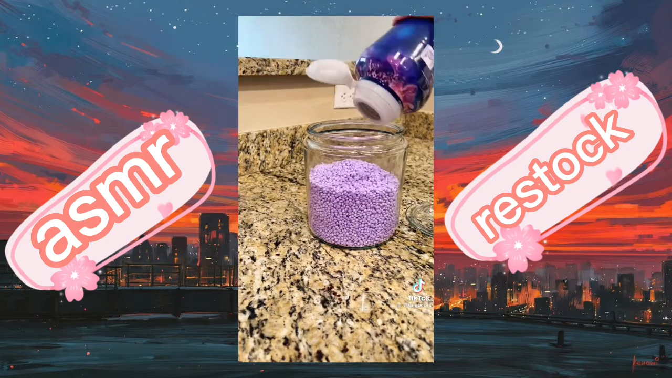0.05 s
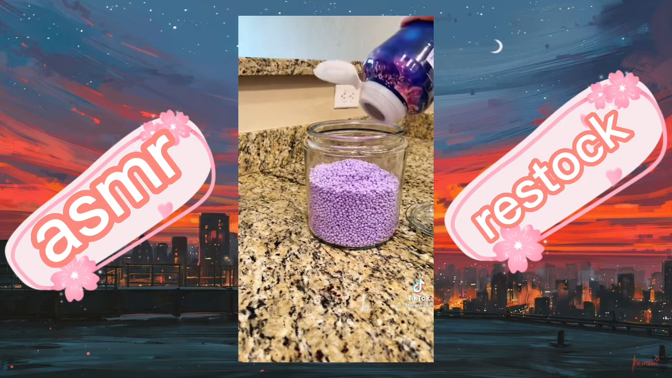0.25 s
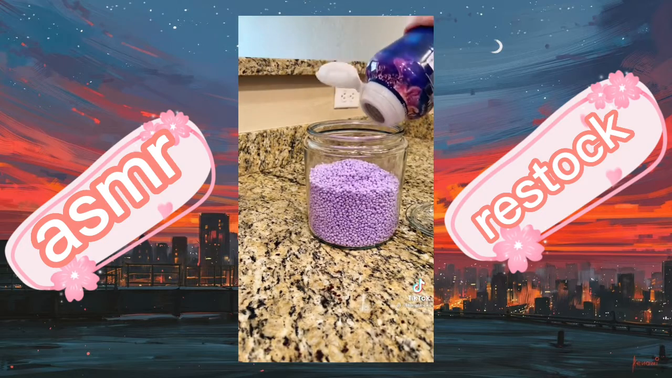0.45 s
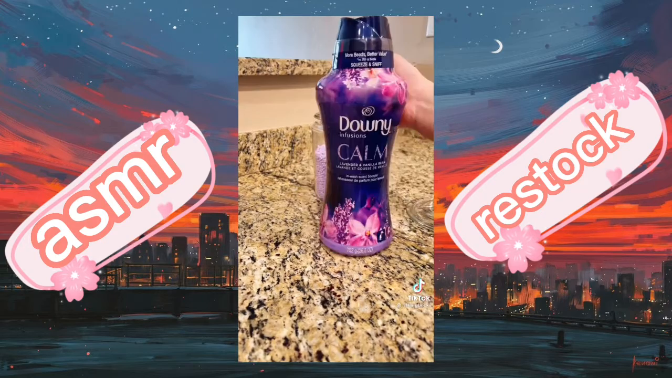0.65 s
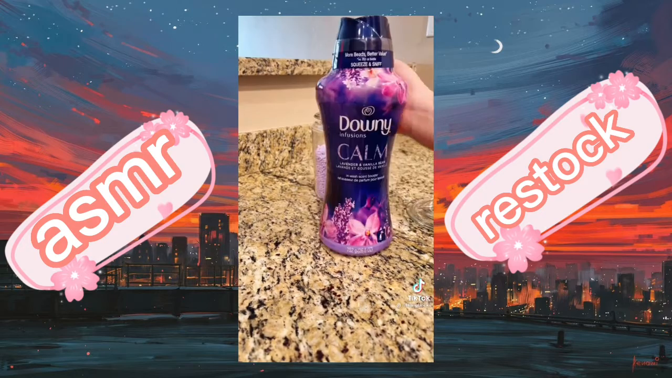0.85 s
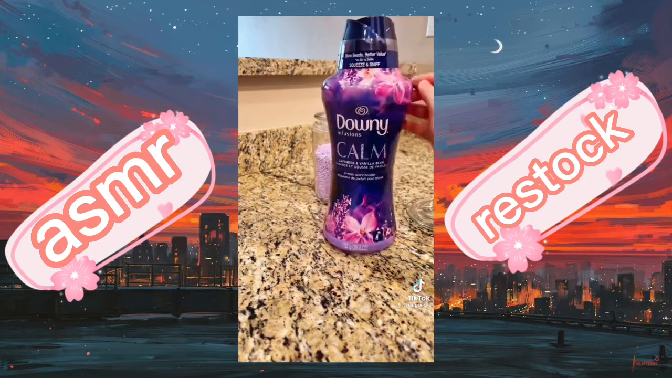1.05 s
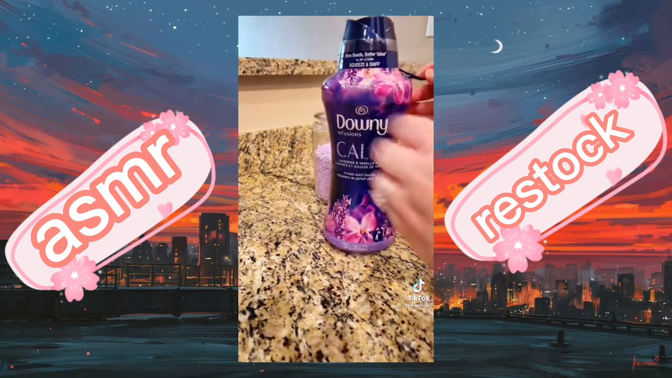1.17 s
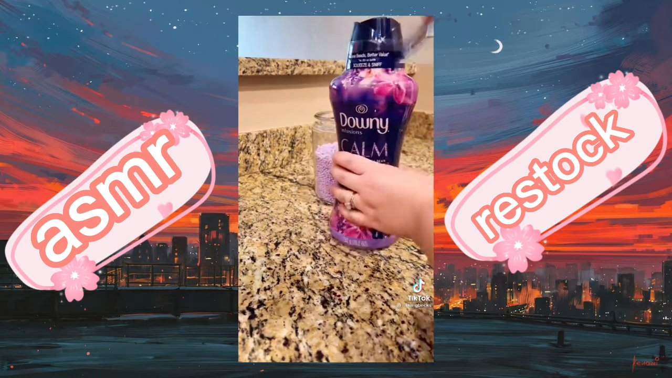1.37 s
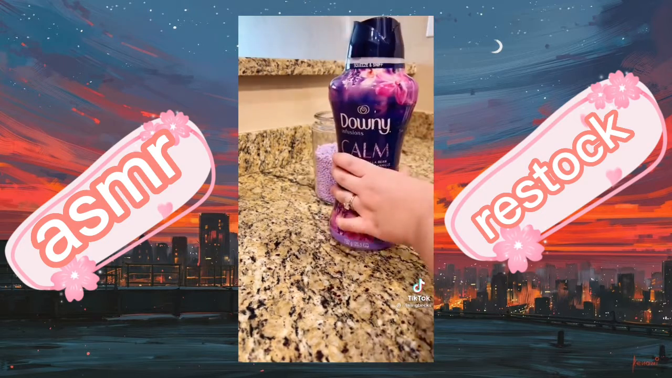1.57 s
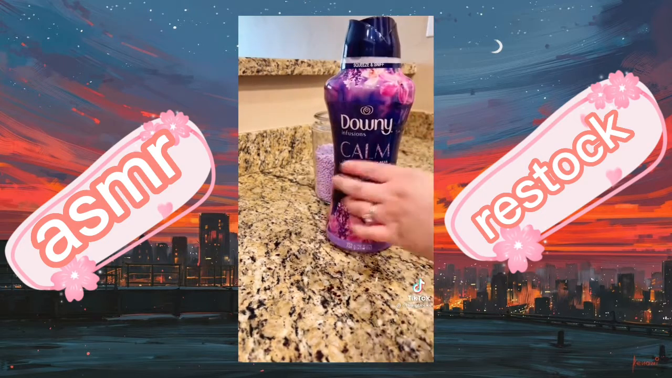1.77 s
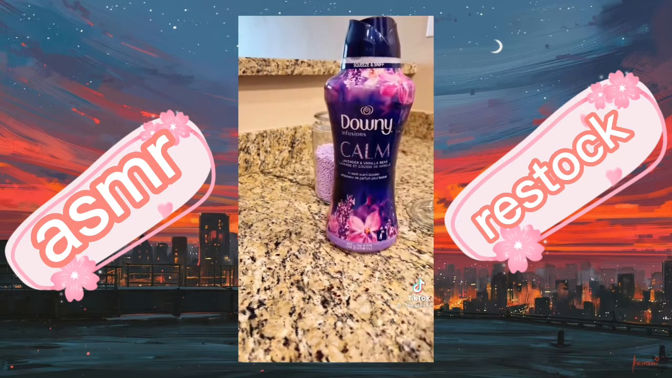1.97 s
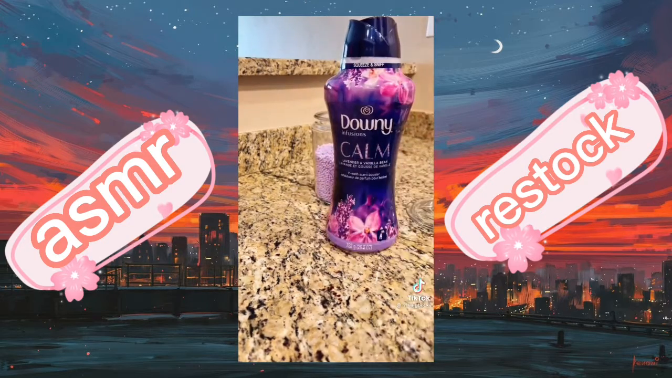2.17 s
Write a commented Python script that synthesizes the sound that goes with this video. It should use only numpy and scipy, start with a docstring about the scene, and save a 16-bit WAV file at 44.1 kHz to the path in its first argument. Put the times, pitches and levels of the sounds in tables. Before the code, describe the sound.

Scent beads rattle from a plastic bottle into a jar with hollow knocks, then cap clicks

```python
"""Scent beads trickle from a plastic bottle into a glass jar: noise-like trains of tiny impacts, with a few ticks.
A quick run of jolts cracks the bottle and makes it boom hollowly, built from decaying tones and noise.
After a short near-silence a hand rubs over a bottle on the counter (soft coloured noise), and its plastic
cap scrapes (swelling trains of slips), squeaks and clicks (short bursts with a ring).
Close, mono, in a small kitchen with a short echo tail and a low rumble."""
import sys
import numpy as np
from scipy import signal
from scipy.io import wavfile
from scipy.ndimage import uniform_filter1d

SR = 44100
rng = np.random.default_rng(int(sys.argv[2]) if len(sys.argv) > 2 else 0)


def inscribe(sig):
    """Save sig as 16-bit PCM at rate SR to the path in sys.argv[1].

    A 1-D sig is mono; a 2-D sig holds one channel per row.
    Samples are clipped to [-1, 1] before scaling.
    """
    pcm = np.round(np.clip(np.atleast_2d(sig).T, -1, 1) * 32767)
    wavfile.write(sys.argv[1], SR, pcm.astype(np.int16))


N = 97020
T = np.arange(N) / SR  # time of every sample, in seconds

# All tone tables give a spectrum shape; only the differences between their levels matter.
# Strength of the bead stream over time: time_s, level_db
BEAD_FLOW = [(0, -45), (.02, -29), (.042, -33.5), (.055, -26), (.13, -31), (.172, -25.5), (.2, -35),
             (.212, -21.5), (.245, -26), (.28, -25), (.32, -38.5), (.335, -26), (.4, -29), (.425, -19),
             (.446, -29), (.47, -20), (.5, -30.5), (.535, -34), (.58, -49), (.615, -31.5), (.655, -63)]
# Tone of the bead stream: pitch_hz, level_db
BEAD_TONE = [(180, -46.5), (300, -6.5), (600, -14.5), (1330, -12), (1670, -12), (2210, -5), (3400, 1.5),
             (5850, -9.5), (10100, -9), (12500, -20.5), (15500, -13)]
# Single beads hitting the glass, plus a bright tick on the first two cracks (0.2507, 0.3416): start_s, level_db
TICKS = [(0.0561, -24), (0.0647, -17.5), (0.1197, -18), (0.2105, -22), (0.232, -24.5),
         (0.2507, -11.5), (0.3416, -12), (0.3763, -11.5), (0.4077, -10.5), (0.4618, -8)]
# Tone of those ticks: pitch_hz, level_db
TICK_TONE = [(500, -8), (2000, -15.5), (3600, -2), (5500, -8.5), (8000, -8), (10000, -6.5), (12500, -16),
             (15000, -10.5)]
# Jolts of the bottle: start_s, crack_db, crack_rise_s, wall_db, wall_pitch_ratio, boom_db,
# flex_db (before the blow), rebound_db (relative to the boom)
JOLTS = [(0.2509, -0.5, 0.0017, -6.5, 0.99, -5.5, -22, -9),
         (0.3398, -5, 0.0013, -12, 0.97, -10, -12.5, -12), (0.4213, -8.5, 0.0031, -25.5, 1.11, -2, -11, -4),
         (.5132, -2.5, 0.0018, -8, .99, -7, -16, -22), (0.6034, -9, 0.0022, -13, 0.97, -17.5, -11, -22.5)]
# Tone of the crack: pitch_hz, level_db
CRACK_TONE = [(300, -8.5), (700, -2.5), (1200, 2.5), (2000, -5), (3500, 3), (5500, -6), (8000, -9.5),
              (10000, -5), (12500, -18), (15000, -15.5)]
# Resonance of the air in the bottle: pitch_hz, blow_db, ring_db, t60_s (time to fade by 60 dB)
HOLLOW_MODE = (176.5, -2, -10.5, 0.44)
# Resonances of the bottle wall: pitch_hz, blow_db, ring_db, t60_s
WALL_MODES = [(235.4, -5.5, -20.5, 0.24), (390.4, -7, -9.5, 0.12), (435.2, -1, -8.5, 0.16),
              (720, -14, -19, 0.15), (848, -17, -24.5, 0.09), (1157, -10, -17.5, 0.076),
              (1498, -15.5, -24.5, 0.077), (1945, -13, -24.5, 0.08), (2260, -20.5, -19.5, 0.07)]
# Tone of a soft thud: pitch_hz, level_db
THUD_TONE = [(50, -15), (100, -0.5), (150, 3.5), (290, -13), (420, -9.5), (600, -9), (1200, -18),
             (2500, -27), (8000, -50)]
# Tone of beads tumbling against the wall: pitch_hz, level_db
TUMBLE_TONE = [(200, -10), (370, 1), (440, 0.5), (550, -13), (720, -6.5), (850, -16.5), (4000, -36.5)]
# Plastic scraping on plastic: peak_s, rise_s, fall_s, hiss_db, grit_db, body_db
SCRAPE_STROKES = [(1.371, .015, 0.016, -17, -31, -19.5), (1.421, 0.027, 0.02, -48, -35, -26),
                  (1.545, 0.0084, 0.017, -28.5, -40, -34.5), (1.585, 0.0088, 0.016, -34, -23, -31),
                  (1.64, 0.0071, 0.0087, -24.5, -28, -31)]
# Tone of the hiss: pitch_hz, level_db
HISS_TONE = [(1000, -28), (3400, 5), (4500, -5.5), (6500, 3.5), (8500, -6), (10200, 6), (12200, -13),
             (14500, 2.5), (16000, -5)]
# Tone of the grit: pitch_hz, level_db
GRIT_TONE = [(850, -13), (1100, 2.5), (1500, -12), (3200, 4), (4200, -1.5), (15000, -28)]
# Tone of the bottle's body under a scrape: pitch_hz, level_db
BODY_TONE = [(60, -13), (130, 2.5), (300, -7.5), (600, -3), (850, 0.5), (1400, -6), (2300, -6.5),
             (3500, -8.5), (7000, -18), (15000, -38)]
# Clicks of the cap: start_s, level_db, fall_s, top_db (extra level of the top octave)
CAP_CLICKS = [(1.2236, -27.5, 0.0053, 18), (1.359, -18, .002, 3), (1.373, -17.5, 0.0012, 6),
              (1.426, -15, 0.0028, -12), (1.4273, -14.5, 0.0013, -9), (1.546, -5, 0.0015, 0),
              (1.585, -16, 0.0021, 5), (1.598, -24, 0.001, -4), (1.64, -11, 0.0016, -4),
              (1.6425, -19, 0.0022, 1), (1.762, -37, 0.005, 10)]
# Tone of the clicks: pitch_hz, level_db
CAP_TONE = [(300, -14), (900, -9.5), (2200, -4), (3400, 4), (4500, 1), (5500, 2), (6500, 0), (8000, 1.5),
            (9800, 1), (12300, -8.5), (14500, -4.5)]
# Ringing tones of the cap: pitch_hz, level_db, t60_s
CAP_MODES = [(3446, -14.5, 0.027), (4100, -26, .025), (5420, -14.5, 0.028), (7730, -13.5, 0.026),
             (9660, -21, 0.025)]
# Hand sliding over the bottle: time_s, level_db
HAND_RUB = [(.78, -71.5), (.876, -63.5), (.915, -46.5), (.965, -53.5), (1.005, -63), (1.025, -50.5),
            (1.1, -55), (1.122, -41.5), (1.22, -44.5), (1.29, -47.5), (1.325, -47), (1.5, -45.5),
            (1.79, -49), (1.87, -42), (1.98, -39.5), (2.06, -51), (2.2, -49.5)]
# Tone of the rubbing: pitch_hz, level_db
RUB_TONE = [(150, -27), (250, -3), (750, -10), (1100, -5.5), (1400, -10), (2440, -6.5), (8620, -16),
            (12600, -22), (15500, -15.5)]
# Beads shifting inside the bottle: start_s, level_db, fall_s
BEAD_SHIFTS = [(1.64, -16.5, 0.024), (2.13, -38.5, 0.021)]
# Tone of the shifting beads: pitch_hz, level_db
SHIFT_TONE = [(1500, -20), (2400, -3), (4400, -.5), (4780, 7), (5200, -1), (8000, -6), (10500, -11.5),
              (15000, -26)]
# Soft bumps of the hand on the bottle: start_s, level_db
HAND_BUMPS = [(1.21, -43.5), (1.31, -36.5), (1.337, -41.5), (1.585, -36), (1.759, -42), (1.984, -41.5),
              (2.124, -42)]
# Tone of the room rumble: pitch_hz, level_db
RUMBLE_TONE = [(25, -14.5), (70, -9.5), (135, 0), (260, -12.5), (500, -18), (1000, -23.5), (3000, -34.5),
               (15000, -54)]
# Level of the room rumble over time: time_s, level_db
RUMBLE_LEVEL = [(.05, 5.5), (.15, 3.5), (.78, -7.5), (1.25, -5), (1.55, 1.5), (1.82, -1), (2.2, 0)]

BEADS_PER_S, BEAD_SPREAD_DB = 5500, 2
CLUMP_S, CLUMP_DB = 0.0082, 1.5  # the beads leave the bottle in small clumps
TICK_FALL_S = CRACK_FALL_S = 0.0028
SWELL_CYCLES, SWELL_S, SWELL_SHARPNESS = 1.35, 0.003, 3.4  # how a bottle resonance builds up
DROOP, DROOP_S = 0.05, 0.0067  # the wall starts sharp by this share and relaxes
FLEX_LEAD_S, FLEX_WIDTH_S = 0.0018, 0.0054
REBOUND_S, REBOUND_FALL_S = 0.0241, 0.032  # the boom returns once more a moment later, fading faster
CHOKE_S = 0.0067  # a new jolt stops the ring of the one before
THUD_DB, THUD_RISE_S = -16.5, 0.0093
TUMBLE_DB, TUMBLE_FALL_S = -18, 0.036
SLIPS_PER_S, SLIP_SPREAD_DB = 9000, 1.5
STROKE_ROUNDNESS, BODY_LAG_S = 1.24, 0.0086
CATCH_S, CATCH_DB = 0.0011, 2  # the plastic catches and lets go
SQUEAK_S, SQUEAK_DB = (1.528, 1.546), -25.5  # the cap drags just before it snaps
TOP_HZ = 11000  # where the top octave of a click begins
BUMP_RISE_S = 0.012
ROOM_DB, ROOM_T60_S = -14, 0.26
RUMBLE_DB = -46
SILENCE_S, SILENCE_DB = (0.656, 0.781), -36  # span and gain of the near-silence
EDGE_HZ = 15650  # upper edge of the sound's band


def beads():
    """The stream patters on the heap as many tiny impacts; a few beads tick on the glass, and the first two
    cracks get a bright tick."""
    patter = grains(BEADS_PER_S, BEAD_SPREAD_DB)
    stream = patter * uneven(CLUMP_S, CLUMP_DB) * level(BEAD_FLOW)
    ticks = sum(burst(start, db, TICK_FALL_S) for start, db in TICKS)
    return colour(stream, BEAD_TONE) + colour(ticks, TICK_TONE)


def knocks():
    """The bottle flexes into each jolt and cracks; wall and hollow air ring, and the boom returns a moment
    later; beads thud and tumble."""
    crack, body, thud, tumble = np.zeros((4, N))
    hollow = mode(0, *HOLLOW_MODE)
    wall = sum(mode(0, *row, droop=DROOP) for row in WALL_MODES)
    rebound = later(hollow, REBOUND_S) * dying(REBOUND_S, REBOUND_FALL_S)
    for start, crack_db, rise, wall_db, wall_pitch, boom_db, flex_db, rebound_db in JOLTS:
        crack += burst(start, crack_db, CRACK_FALL_S) * np.clip((T - start) / rise, 0, 1)
        # The flex is a short wobble at the hollow pitch, centred just before the blow.
        flex_shape = np.exp(-((T - start + FLEX_LEAD_S) / FLEX_WIDTH_S) ** 2)
        flex = amp(flex_db) * flex_shape * np.sin(2 * np.pi * HOLLOW_MODE[0] * (T - start))
        boom = amp(boom_db) * (hollow + amp(rebound_db) * rebound)
        wall_ring = amp(wall_db) * np.interp(T * wall_pitch, T, wall)  # faster reading raises the pitch
        choke = np.clip((start - T) / CHOKE_S, 0, 1)
        body = body * choke + flex + later(boom + wall_ring, start)
        thud += amp(boom_db + THUD_DB) * swell(start, THUD_RISE_S)
        tumble += amp(crack_db + TUMBLE_DB) * dying(start, TUMBLE_FALL_S)
    thud_sound = colour(thud * rng.standard_normal(N), THUD_TONE)
    tumble_sound = colour(tumble * rng.standard_normal(N), TUMBLE_TONE)
    return colour(crack, CRACK_TONE) + body + thud_sound + tumble_sound


def scrapes():
    """Tiny uneven slips swell and fade: hiss and grit first, the body of the bottle just after."""
    hiss, grit, body = np.zeros((3, N))
    for peak, rise, fall, hiss_db, grit_db, body_db in SCRAPE_STROKES:
        distance = np.maximum((peak - T) / rise, (T - peak) / fall)
        stroke = np.exp(-distance ** STROKE_ROUNDNESS)
        hiss += amp(hiss_db) * stroke
        grit += amp(grit_db) * stroke
        body += amp(body_db) * np.interp(T - BODY_LAG_S, T, stroke)
    catch = uneven(CATCH_S, CATCH_DB)
    out = np.zeros(N)
    for push, tone in [(hiss, HISS_TONE), (grit, GRIT_TONE), (body, BODY_TONE)]:
        slips = grains(SLIPS_PER_S, SLIP_SPREAD_DB)
        out += colour(push * catch * slips, tone)
    return out


def cap():
    """The cap drags with a faint squeak (noise through its ring) and clicks sharply, with a short ring."""
    ring = np.zeros(N)
    for hz, db, t60 in CAP_MODES:
        ring += amp(db - 60 * T / t60) * np.sin(2 * np.pi * hz * T)
    drag = np.sqrt(np.interp(T, SQUEAK_S, [0, 1], right=0)) * rng.standard_normal(N)
    out = amp(SQUEAK_DB) * signal.fftconvolve(drag, ring / np.linalg.norm(ring))[:N]
    samples = np.arange(N)
    for start, db, fall, top_db in CAP_CLICKS:
        tone = [(hz, tone_db + top_db * (hz > TOP_HZ)) for hz, tone_db in CAP_TONE]
        click = colour(burst(start, db, fall), tone)
        out += click + amp(db) * np.interp(samples - round(start * SR), samples, ring)
    return out


def handling():
    """The soft rub of the hand is coloured noise; beads settling in the bottle are fading impact trains."""
    rub = level(HAND_RUB) * rng.standard_normal(N)
    shifts = sum(amp(db) * dying(start, fall) for start, db, fall in BEAD_SHIFTS)
    settling = shifts * grains(BEADS_PER_S, BEAD_SPREAD_DB)
    return colour(rub, RUB_TONE) + colour(settling, SHIFT_TONE)


def bumps():
    """Fingers land softly on the full bottle: each push is a swell of low noise."""
    push = sum(amp(db) * swell(start, BUMP_RISE_S) for start, db in HAND_BUMPS)
    return colour(push * rng.standard_normal(N), THUD_TONE)


def room(x):
    """A short tail of many small reflections that dies away, thin in the bass."""
    taps = grains(3000, 0.89) * (T > .003) * amp(-60 * T / ROOM_T60_S)
    wet = signal.fftconvolve(x, taps / np.linalg.norm(taps))[:N]
    bass_cut = signal.butter(2, 500, "high", fs=SR, output="sos")
    return amp(ROOM_DB) * signal.sosfilt(bass_cut, wet)


def rumble():
    """The low rumble of the room: noise shaped toward the bass, slowly changing in level."""
    return amp(RUMBLE_DB) * level(RUMBLE_LEVEL) * colour(rng.standard_normal(N), RUMBLE_TONE)


def mode(start, hz, blow_db, ring_db, t60, droop=0):
    """A bottle resonance swells quickly, drops back and rings on; with droop its pitch settles downward."""
    t = np.maximum(T - start, 0)
    u = t / (SWELL_S + SWELL_CYCLES / hz)
    blow = amp(blow_db) * (u * np.exp(1 - u)) ** SWELL_SHARPNESS
    ring = amp(ring_db - 60 * t / t60) * (1 - np.exp(-2 * u ** 2))
    bent_time = t + droop * DROOP_S * (1 - np.exp(-t / DROOP_S))
    return (blow + ring) * np.sin(2 * np.pi * hz * bent_time)


def grains(per_s, spread_db):
    """A dense train of tiny impacts at random moments, of uneven size and random sign, rms 1."""
    size = amp(spread_db * np.minimum(rng.exponential(1, N), 4))
    hits = rng.random(N) < per_s / SR
    return unit(size * rng.choice([-1., 1.], N) * hits)


def burst(start, db, fall):
    """A brief chatter of contact: random plus and minus steps that die away."""
    return amp(db) * dying(start, fall) * rng.choice([-1., 1.], N)


def dying(start, fall):
    """A sudden start and an exponential fall."""
    return (T >= start) * np.exp(-np.maximum(T - start, 0) / fall)


def swell(start, rise):
    """A soft push that peaks after its rise time."""
    u = np.maximum(T - start, 0) / rise
    return u * np.exp(1 - u)


def uneven(length, depth_db):
    """A gain that wanders at random over the given time in seconds, rms 1."""
    width = max(length * SR, 1)
    window = np.exp(-(np.arange(-2000, 2001) / width) ** 2)
    wander = unit(signal.fftconvolve(rng.standard_normal(N), window, "same"))
    return unit(amp(depth_db * wander))


def colour(x, tone):
    """Gives a sound the tone's spectrum, with a filter of unit energy that never acts ahead of time."""
    hz, db = np.transpose(tone)
    f = abs(np.fft.fftfreq(4096, 1 / SR))
    gain = amp(np.interp(np.log(f + 1), np.log(hz), db))
    log_gain = np.log(gain * np.minimum((f + 1) / hz[0], 1))  # fades below the lowest pitch
    taps = np.fft.ifft(np.exp(np.conj(signal.hilbert(log_gain)))).real  # minimum phase
    return signal.fftconvolve(x, taps / np.linalg.norm(taps))[:N]


def later(x, s):
    """Delays a sound by s seconds."""
    return np.interp(T - s, T, x, left=0)


def level(points):
    """Gain along a curve of time_s, level_db."""
    return amp(np.interp(T, *np.transpose(points)))


def unit(x):
    """Scales to rms 1."""
    return x / np.sqrt(np.mean(x ** 2) + 1e-20)


def amp(db):
    """Decibels to gain."""
    return 10 ** (np.asarray(db) / 20)


def scene():
    """The pouring, cut off short, then the handling; room rumble under both, the same in both channels."""
    pouring = beads() + knocks()
    touching = scrapes() + cap() + handling() + bumps()
    until_cut = np.clip((SILENCE_S[0] - T) / 0.002, 0, 1)
    pouring_in_room = (pouring + room(pouring)) * until_cut
    touching_in_room = touching + room(touching)
    return np.tile(pouring_in_room + touching_in_room + rumble(), (2, 1))


def record(dry):
    """The sound drops out briefly; peaks clip; then the highest treble is cut away."""
    in_silence = (T > SILENCE_S[0]) & (T < SILENCE_S[1])
    gate = uniform_filter1d(np.where(in_silence, amp(SILENCE_DB), 1.), size=90)  # softened edges
    taps = signal.firwin(401, EDGE_HZ, window=("kaiser", 8), fs=SR)
    return signal.oaconvolve(np.clip(dry * gate, -1, 1), taps[None], "same")


dry = scene()
out = record(dry)
inscribe(out)
```